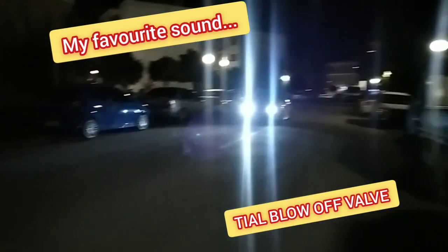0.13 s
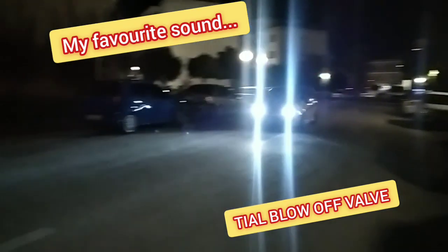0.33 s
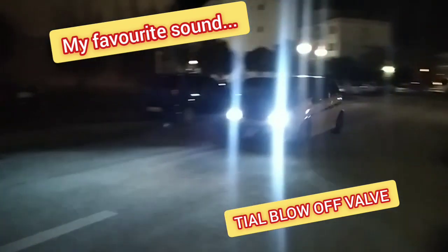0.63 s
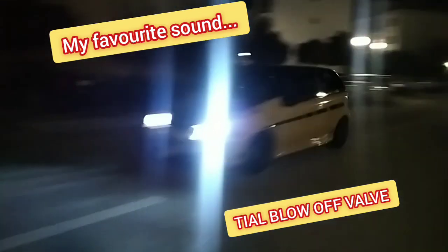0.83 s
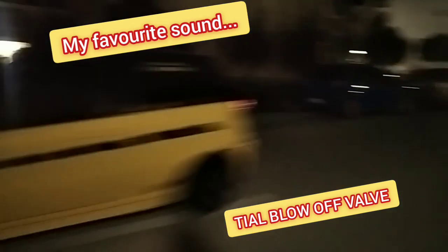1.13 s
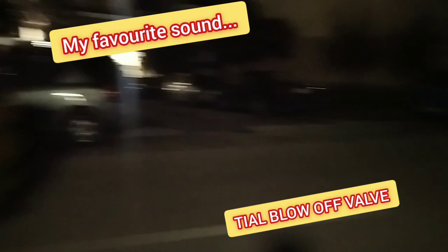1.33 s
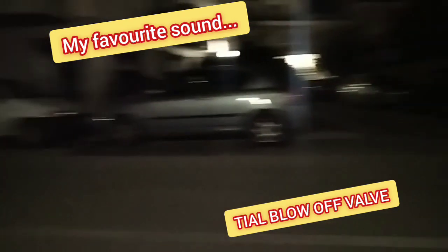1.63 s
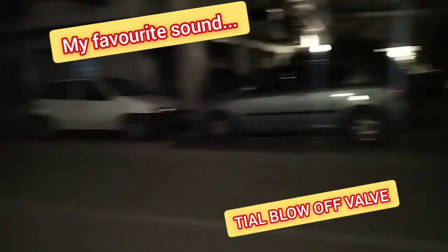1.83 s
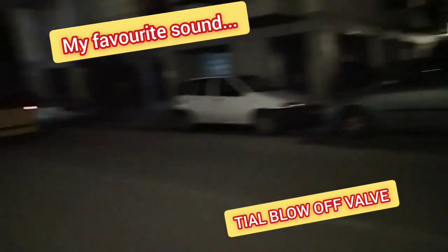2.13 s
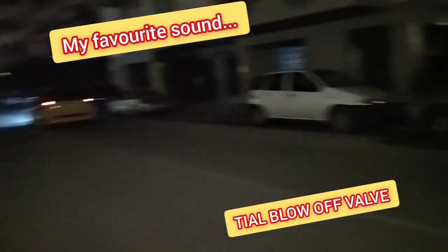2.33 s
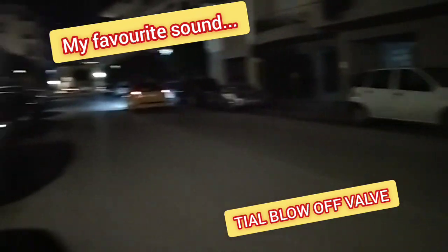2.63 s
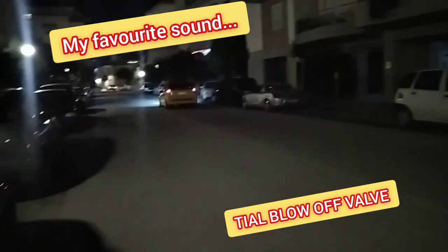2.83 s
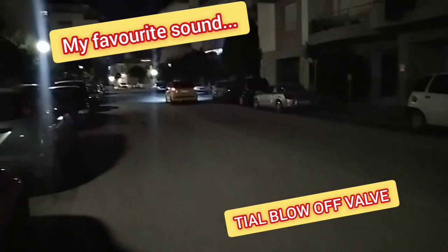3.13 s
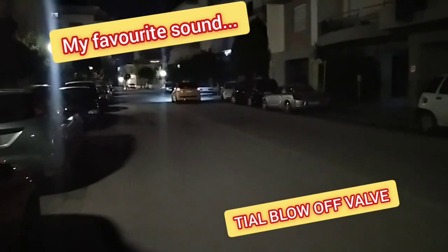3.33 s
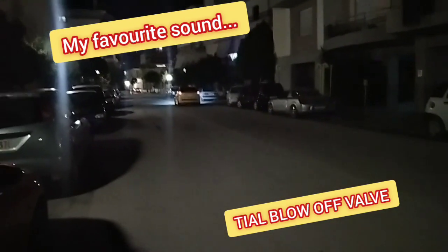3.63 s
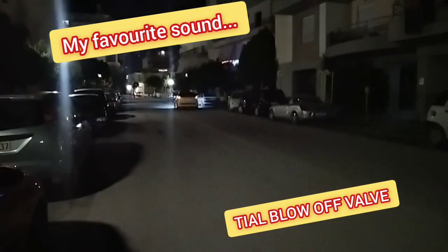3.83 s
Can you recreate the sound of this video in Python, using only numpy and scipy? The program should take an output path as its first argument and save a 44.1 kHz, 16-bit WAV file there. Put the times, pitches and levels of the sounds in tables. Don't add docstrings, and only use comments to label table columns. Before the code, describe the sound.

A turbo car's brief engine roar cuts into a burst of stuttering air hisses and a falling whine; it rolls by close, deep exhaust pulsing, then fades away outdoors, with small handling ticks on the stereo camera microphones.

```python
import sys
import numpy as np
from scipy import signal
from scipy.fft import rfft, irfft
from scipy.io import wavfile
from scipy.ndimage import uniform_filter1d, map_coordinates

SR = 44100
rng = np.random.default_rng(int(sys.argv[2]) if len(sys.argv) > 2 else 0)


def gain_from_db(level_db):
    decades = np.asarray(level_db, float) / 20
    return 10 ** decades


def store_wav(level_fs):
    pcm = np.round(np.clip(np.atleast_2d(level_fs), -1, 1) * 32767)
    wavfile.write(sys.argv[1], SR, pcm.T.astype(np.int16))


N = 176400
T = np.arange(N) / SR
HZ = np.fft.rfftfreq(1024, 1 / SR)
FRAME_S = np.arange(N // 256 + 5) * 256 / SR
LIFT_S = 0.2326

# time in seconds, level in dB, view (0 front, 1 rear, 2 far street).
PASSAGE = [(0, -24.5, 0.16), (.5, -29, 0.03), (.72, -29, 0), (.9, -28, 0.18), (1.12, -26.5, 0.18),
           (1.3, -32.5, 0.42), (1.45, -34, 0.79), (1.9, -37.5, 1.22), (2.3, -42, 1.54), (2.8, -46.5, 1.93),
           (3.3, -51.5, 1.84), (4, -55.5, 1.72)]
# frequency in Hz, left over right in dB.
PORT_LEAN = [(250, 0.85), (480, 2.5), (950, -3), (3700, -.5), (5700, -7), (7500, -9), (8700, -8),
             (13400, 7.5)]


def read(points, hz):
    f, value = np.transpose(points)
    return np.interp(np.log(hz + 1), np.log(f + 1), value)


def curve(table, col, t):
    rows = np.array(table, float)
    return np.interp(t, rows[:, 0], rows[:, col])


def drift(size):
    x = rng.standard_normal(N // 50 + 1)
    for _ in range(2):
        x = uniform_filter1d(x, size // 50)
    return np.interp(np.arange(N) / 50, np.arange(len(x)), x / x.std())


def unit_db(points, hz):
    low_cut_db = 40 * np.log10(np.maximum(points[0][0] / (hz + 1), 1))
    db = read(points, hz) - low_cut_db
    return db - 10 * np.log10(np.mean(gain_from_db(db) ** 2))


def ports(hz):
    # frequency in Hz, radians by which the left port leads.
    lead = [(400, 0), (680, -.9), (1350, -.9), (2550, -1.3), (2760, -2.5), (2980, -2.5), (3200, .6),
            (4550, -.7)]
    # frequency in Hz, width in Hz, gain in dB.
    cavities = [(2550, 264, -7), (5080, 600, -4)]
    tilt = gain_from_db(read(PORT_LEAN, hz) / 2) * np.exp(.5j * read(lead, hz))
    cavity_db = sum(db * np.exp(-((hz - f) / width) ** 2) for f, width, db in cavities)
    return np.array([tilt * gain_from_db(cavity_db), 1 / tilt])


def noise(field_db, patchy_db):
    # frequency in Hz, left-right likeness from 0 to 1.
    likeness = [(300, 0.97), (480, 0.84), (950, 0.57), (1700, 0.5), (2450, 0.22), (2880, 0.75),
                (3600, 0.38), (5000, 0.14)]
    a, b, c, d, patches = rng.standard_normal((len(FRAME_S), 513, 5)).T
    patches = uniform_filter1d(patches, size=14, axis=0)
    patches = uniform_filter1d(patches, size=10, axis=1)
    same = np.clip(read(likeness, HZ), 0, 1)[:, None]
    left = a + 1j * b
    right = same * left + np.sqrt(1 - same ** 2) * (c + 1j * d)
    z = np.array([left, right]) * ports(HZ)[:, :, None]
    z = z * gain_from_db(field_db + patchy_db * patches / patches.std() + np.zeros(a.shape))
    return signal.istft(z, nperseg=1024, noverlap=768)[1][:, :N] / 26.1


def placed(x):
    hz = np.fft.rfftfreq(N + SR, 1 / SR)
    return irfft(rfft(x, N + SR) * ports(hz))[:, :N]


def handling():
    # time in seconds, level in dB, left over right in dB, length in seconds.
    ticks = [
        (2.165, -59, 8, 0.026),
        (2.331, -54, -12, 0.0072),
        (2.649, -70, 8, 0.0084),
        (3.345, -54, 9, 0.003),
        (3.77, -68, 0, 0.0066),
        (3.958, -66, 12, 0.061),
    ]
    # frequency in Hz, level in dB per Hz.
    rustle = [(1500, -3), (6000, 0), (14000, -13)]
    grit = noise(unit_db(rustle, HZ)[:, None], 2.0)
    return grit * sum(gain_from_db([[db + pan_db / 2], [db - pan_db / 2]]) * np.exp(-((T - s) / length) ** 2)
                      for s, db, pan_db, length in ticks)


def rolling():
    # frequency in Hz, level in dB per Hz.
    front = [(400, -9), (1270, -6), (2500, -10), (2900, -7.5), (3600, -10), (6870, -10), (9500, -19),
             (14300, -37.5)]
    rear = [(400, -5), (850, -13), (1450, -10), (1800, -6.5), (2450, -13.5), (3400, -19.5), (7290, -23),
            (10500, -36)]
    far_street = [(600, -8), (1200, 2), (1700, -7.5), (3100, -13), (4200, -21.5), (7000, -22.5),
                  (10000, -34), (14300, -68)]
    view = np.clip(curve(PASSAGE, 2, FRAME_S), 0, 2)
    field = sum(unit_db(colour, HZ)[:, None] * np.maximum(1 - abs(view - k), 0)
                for k, colour in enumerate((front, rear, far_street)))
    return gain_from_db(curve(PASSAGE, 1, T) + 0.5 * drift(size=1500)) * noise(field, 1.0)


def pull():
    # frequency in Hz, level in dB, swell in dB per second.
    tones = [(157.7, -28.5, -10.5), (146.5, -29.5, 7), (235.4, -39.5, -18), (281.4, -43, 6),
             (315, -29.5, 8), (351, -41.5, 37), (436, -47, -2), (472, -42.5, 0), (614, -45.5, 7),
             (779, -33.5, -42), (809, -35, 60), (925, -40, 74), (1260, -41, -3), (1255, -40, -5),
             (1768, -46.5, 0), (1830, -40, 27.5), (1790, -34, 43)]
    # frequency in Hz, level in dB per Hz.
    roar_colour = [(140, -29), (307, -6), (516, -17.5), (791, -11), (1070, -34), (1900, -12.5),
                   (3300, -14.5), (7650, -15), (14300, -35)]
    roar_db = -23
    rise, sag = 0.12, 0.96
    fade_s, bass_fade_s = 0.015, 0.074
    after = np.maximum(T - LIFT_S, 0)
    speed = 1 + rise * (np.minimum(T, LIFT_S) - LIFT_S / 2) - sag * np.minimum(after, 1)
    turned = np.cumsum(speed) / SR
    hum = 0
    for hz, db, swell in tones:
        tone = np.cos(2 * np.pi * (hz * turned + rng.random()))
        fade = np.exp(-(after / (bass_fade_s if hz < 400 else fade_s)) ** 2)
        hum = hum + gain_from_db(db + swell * (T - 0.1773) + drift(size=600)) * tone * fade
    throb = 1 + 0.14 * np.cos(2 * np.pi * tones[0][0] * turned)
    roar = noise(unit_db(roar_colour, HZ)[:, None], 1.4) * throb
    return placed(np.sqrt(2) * hum) + gain_from_db(roar_db) * np.exp(-after / fade_s) * roar


def firing_orders(orders, turns, flutter_db, lead_order):
    total = 0
    for k, db in orders:
        level = gain_from_db(db + flutter_db * np.sqrt(k) * drift(size=900))
        lead = 1.2 * (k == lead_order)
        slip = 0.5 * drift(size=3000)
        total = total + level * np.cos(2 * np.pi * k * turns + lead + slip)
    return total


def exhaust():
    # time in seconds, firing rate in Hz, orders 1, 2 and 3 in dB.
    overrun = [(.27, 124.7, -43, -45, -66), (.43, 117.4, -24.5, -46, -43.5), (.59, 107.5, -41.5, -52, -52),
               (.7, 101.4, -31.5, -36.5, -57), (.8, 99.1, -36, -44, -55), (.93, 93.9, -26, -38, -52),
               (1.03, 90.1, -24.5, -33.5, -38.5), (1.14, 82.57, -20, -35, -31),
               (1.3, 73.7, -19, -32.5, -34.5), (1.55, 59.9, -25, -30.5, -31), (1.67, 61.1, -26.5, -40, -32),
               (1.87, 66.84, -25, -37.5, -36.5), (1.98, 65.94, -32, -46, -38),
               (2.11, 64, -24.5, -40.5, -36), (2.27, 56.8, -37.5, -37, -41.5), (2.41, 50.2, -36, -35, -36),
               (2.5, 45.73, -42, -53, -40)]
    # order, dB relative to the third.
    upper = [(4, -12.5), (5, -18.5), (6, -17.5)]
    # order, dB relative to the second.
    half = [(1.5, -53), (2.5, -17)]
    # time in seconds, firing rate in Hz, orders 2, 3 and 4 in dB.
    coast = [(2.52, 44.8, -38.5, -63, -46), (2.63, 41.44, -42.5, -35.5, -47.5),
             (2.75, 40.02, -30.5, -38.5, -44.5), (2.83, 39.1, -39.5, -53, -43),
             (2.97, 37.62, -31.5, -47, -39), (3.12, 35.14, -44.5, -48, -42), (3.27, 33.8, -34.5, -44, -44),
             (3.4, 32.6, -37.5, -51, -44.5), (3.52, 32.05, -36, -59, -44), (3.65, 32.73, -43, -80, -40),
             (3.9, 35.3, -39, -66, -44)]
    # order, dB relative to the fourth.
    coast_upper = [(1, -11.5), (5, -5.5), (6, -12), (7, -16), (8, -20.5), (3.5, -11)]
    # time in seconds, level change in dB, length in seconds.
    misfires = [
        (2.258, -1, 0.014),
        (2.31, -8, .012),
        (2.391, -7, 0.014),
        (2.474, -3, 0.014),
        (2.657, -19, 0.012),
        (2.792, -5, .015),
        (3.137, -5, 0.012),
        (3.379, -5, 0.012),
        (3.433, -10, .01),
    ]
    # frequency in Hz, level in dB per Hz.
    rumble_colour = [(25, -13), (50, -33), (90, 8), (200, 3), (330, 0.5), (480, -7), (650, -49),
                     (2000, -80)]

    pitch = [row[:2] for row in overrun + coast]
    turns = np.cumsum(curve(pitch, 1, T) * (1 + 0.007 * drift(size=500))) / SR
    first, second, third = (curve(overrun, col, T) for col in range(2, 5))
    near_orders = [(1, first), (2, second), (3, third)]
    near_orders += [(k, third + db) for k, db in upper]
    near_orders += [(k, second + db) for k, db in half]
    far_orders = [(k, curve(coast, k, T)) for k in range(2, 5)]
    fourth = far_orders[-1][1]
    far_orders += [(k, fourth + db) for k, db in coast_upper]
    near = firing_orders(near_orders, turns, flutter_db=0.8, lead_order=2)
    far = firing_orders(far_orders, turns, flutter_db=1.1, lead_order=0)

    begun = np.clip((T - LIFT_S) / 0.013, 0, 1)
    gone = np.clip((T - overrun[-1][0]) / 0.021, 0, 1)
    kick = gain_from_db(1.4 * drift(size=400))
    note = begun * (1 - gone) * near - gone * far * kick
    note = note * gain_from_db(sum(db * np.exp(-((T - s) / length) ** 2) for s, db, length in misfires))

    rumble_db = -36 + 0.62 * (curve(PASSAGE, 1, T) + 35)
    beat = (1 + 0.39 * np.cos(2 * np.pi * turns)) * np.clip(2 * T + 0.54, 0, 1)
    thin_db = -18 / (1 + (HZ[:, None] / 110) ** 4) * np.clip(1 - FRAME_S / 0.84, 0, 1)
    rumble = noise(unit_db(rumble_colour, HZ)[:, None] + thin_db, 1.0)
    return placed(np.sqrt(2) * note) + gain_from_db(rumble_db) * beat * rumble


def valve():
    # time in seconds, level in dB.
    puffs = [
        (0.241, -19.5),
        (0.302, -24),
        (0.343, -32),
        (0.384, -28),
        (0.434, -26.5),
        (.49, -31.5),
        (.54, -35.5),
        (.6, -31),
    ]
    # frequency in Hz, level in dB per Hz.
    vent = [(880, -23), (1500, -27), (2690, -2.5), (2900, -10), (3280, -3), (4230, -1), (6120, -1),
            (8120, -6), (14300, -15.5)]
    rise_s, fall_s = 0.014, 0.054
    shape = sum(gain_from_db(db) * np.exp(-np.where(T < s, ((s - T) / rise_s) ** 2, (T - s) / fall_s))
                for s, db in puffs)
    return shape * noise(unit_db(vent, HZ)[:, None], 2.5)


def whistle(track, clean):
    fuzz_hz, smear_hz, smear_s = 140, 140, 0.84
    hz = curve(track, 1, T)
    tone = np.exp(2j * np.pi * np.cumsum(hz) / SR)
    smear = np.clip(10 * (T - smear_s) + .5, 0, 1)
    gain = gain_from_db(curve(track, 2, T)) * np.clip(20 * (track[-1][0] - T), 0, 1)
    out = []
    for side in (1, -1):
        white = rng.standard_normal(N) + 1j * rng.standard_normal(N)
        thin, wide = (signal.lfilter([1], [1, -np.exp(-np.pi * width / SR)], white)
                      for width in (fuzz_hz, smear_hz))
        fuzz = (1 - smear) * thin / thin.std() + smear * wide / wide.std()
        mix = clean + (1 - clean) * fuzz
        flicker = gain_from_db(7.3 + 2.2 * drift(size=500) + side * read(PORT_LEAN, hz) / 3)
        out.append(flicker * gain * (tone * mix).real)
    return np.array(out)


def turbo():
    # time in seconds, frequency in Hz, level in dB.
    wind_down = [
        (0, 7600, -30.5),
        (.2, 7820, -33),
        (.27, 7520, -33),
        (.4, 6230, -30),
        (.57, 5050, -40),
        (.72, 4050, -32),
        (.79, 3680, -39),
        (.88, 3400, -34),
        (1.02, 3050, -45),
    ]
    # time in seconds, frequency in Hz, level in dB.
    whistle_echo = [
        (1.02, 5650, -50),
        (1.2, 4850, -47),
        (1.36, 4250, -53),
    ]
    clean = 0.58 * np.clip(10 * (0.84 - T) + .5, 0, 1)
    return whistle(wind_down, clean) + (T > whistle_echo[0][0]) * whistle(whistle_echo, 0)


def scene():
    # time in seconds, milliseconds by which the left port lags.
    bearing = [
        (0, 0.027),
        (.9, 0.019),
        (1.25, 0.21),
        (1.6, 0.37),
        (3.3, 0.2),
        (4, 0.18),
    ]
    left, right = rolling() + pull() + exhaust() + valve() + turbo()
    late = np.arange(N) - curve(bearing, 1, T) * SR / 1000
    left = map_coordinates(left, [late], order=3, mode="nearest")
    return np.array([left, right]) + handling()


def low_pass(x):
    return signal.sosfilt(signal.butter(12, 14400, fs=SR, output="sos"), x)


def record(dry):
    hiss = gain_from_db(-81) * rng.standard_normal(dry.shape)
    return low_pass(dry + hiss)


dry = scene()
out = record(dry)
store_wav(out)
```